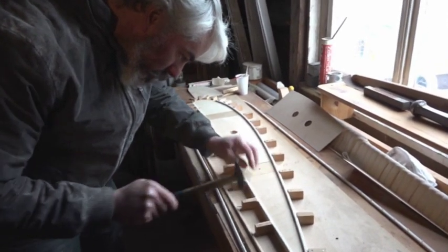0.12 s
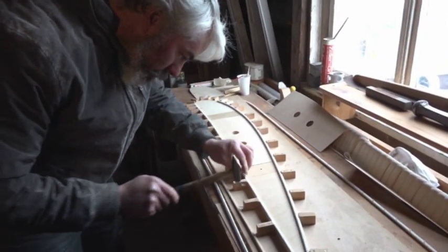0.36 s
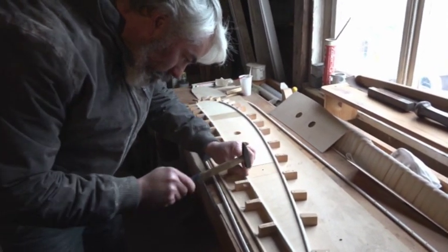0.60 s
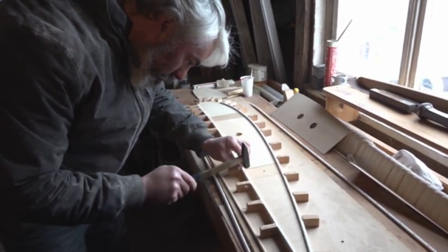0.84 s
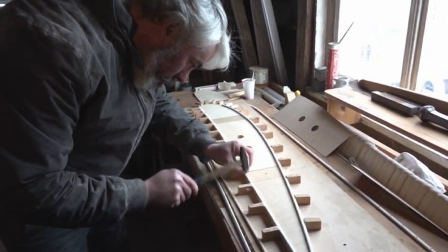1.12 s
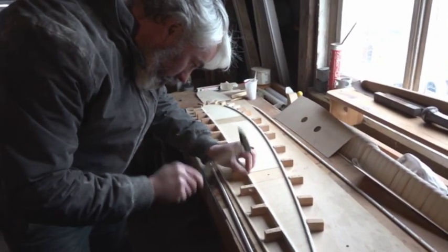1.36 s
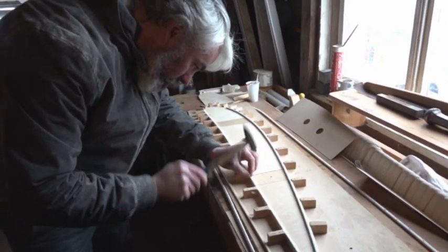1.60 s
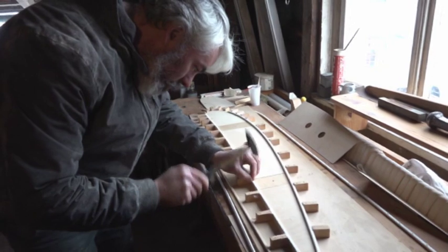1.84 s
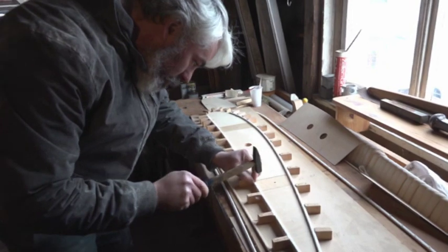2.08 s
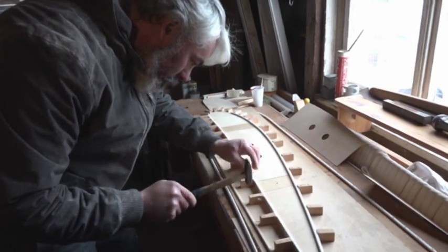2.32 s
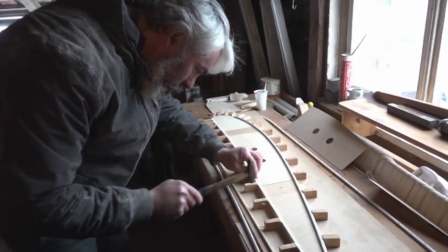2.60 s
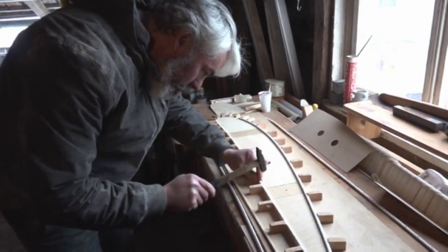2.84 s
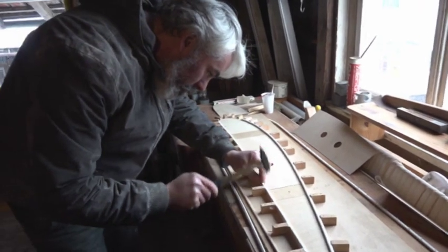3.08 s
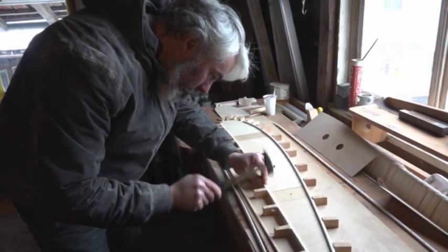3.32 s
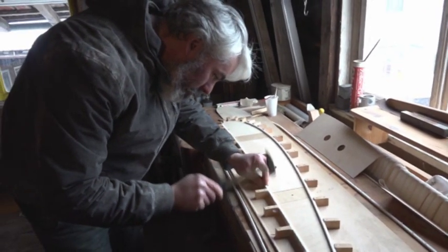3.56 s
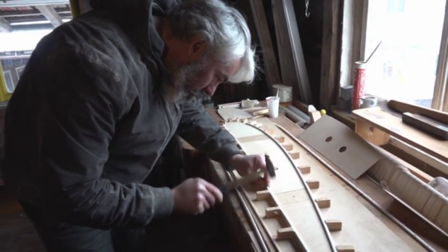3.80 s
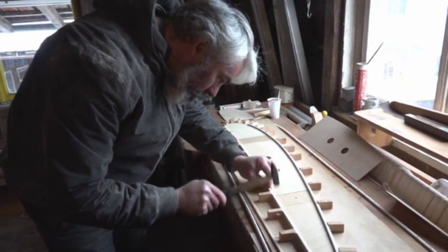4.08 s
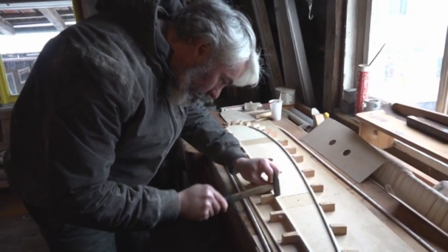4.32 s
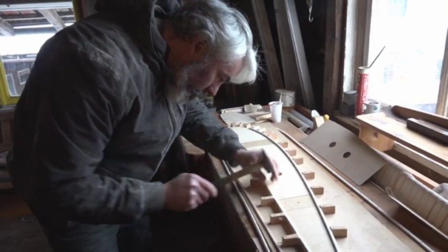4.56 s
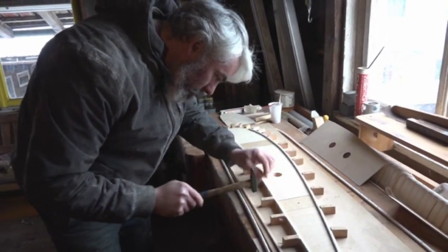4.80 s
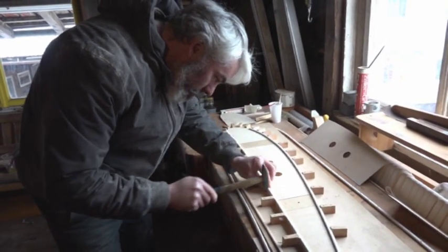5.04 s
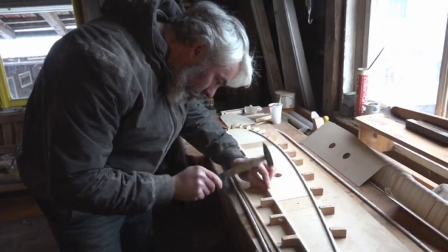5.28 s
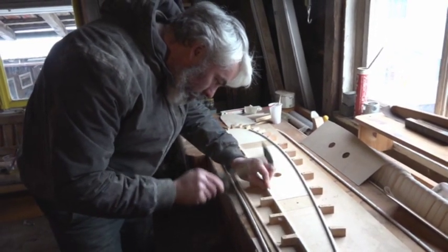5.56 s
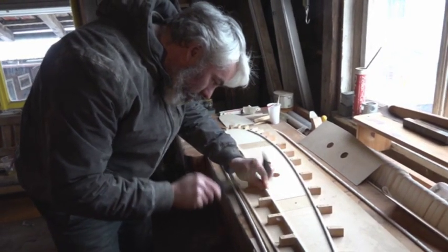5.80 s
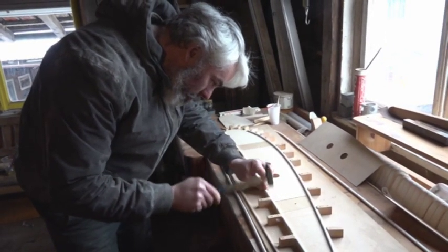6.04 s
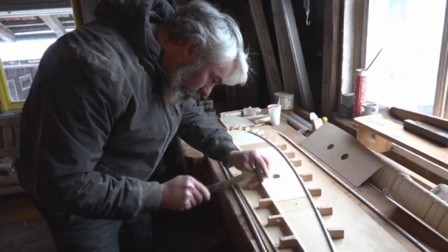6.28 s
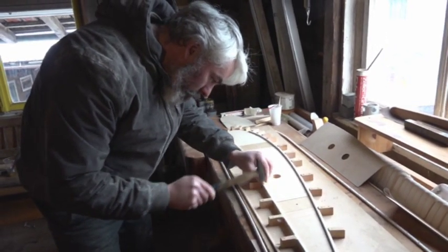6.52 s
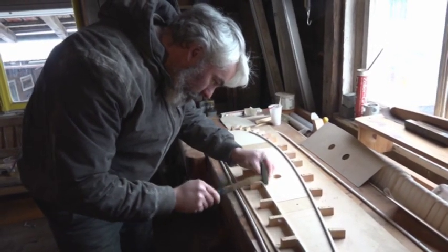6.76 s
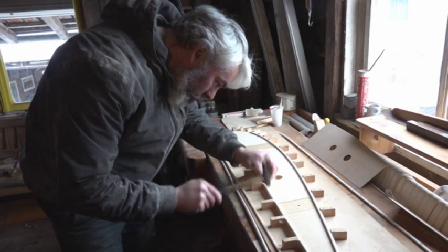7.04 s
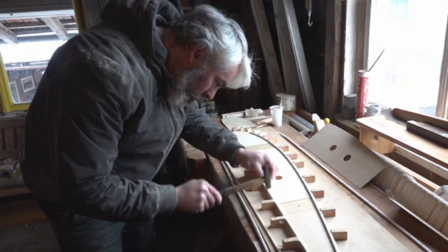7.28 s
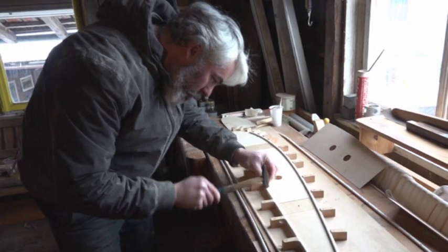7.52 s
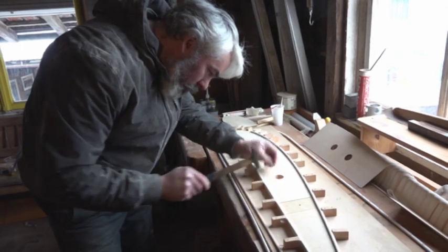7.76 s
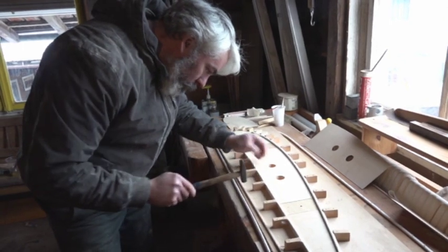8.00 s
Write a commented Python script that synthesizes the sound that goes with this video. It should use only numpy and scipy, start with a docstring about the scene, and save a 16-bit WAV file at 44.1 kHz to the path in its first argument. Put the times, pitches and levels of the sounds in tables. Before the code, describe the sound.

In a small timber workshop a light hammer drives short nails into wood on a bench jig. Each run starts with a dry, light tick and builds to hard, hollow cracks about a quarter second apart, with a short room tail. Between runs come faint sleeve brushes, a thin rasping drag and the tinkle of loose nails. Quiet room tone and hiss; near-mono microphone fairly close, loud blows flattened.

```python
"""In a timber workshop a small hammer taps short nails into wooden strips on a plywood jig.
Each blow is a minimum-phase click that rings damped modes of the jig and excites echoes and a diffuse tail.
Shaped noise makes the brushing sleeve, the rasping drags and the jiggling nails; a faint hum swells from sines.
Room tone and hiss drift behind them. The sound is almost mono, and limiting flattens the hardest blows."""
import sys
import numpy as np
from scipy import signal
from scipy.fft import rfft, irfft, next_fast_len
from scipy.io import wavfile
from scipy.ndimage import uniform_filter1d

SR = 44100
rng = np.random.default_rng(int(sys.argv[2]) if len(sys.argv) > 2 else 0)


def log_audio(samples):
    """Write samples as a 16-bit WAV file to the path given in sys.argv[1]."""
    # one column per channel
    frames = np.atleast_2d(samples).T
    # limit to full scale, then quantise
    limited = np.clip(frames, -1, 1)
    pcm = np.round(limited * 32767).astype(np.int16)
    wavfile.write(sys.argv[1], SR, pcm)


def invert_db(x):
    """Field ratio 10**(x/20) for x, a level in decibels (scalar or array-like)."""
    u = np.asarray(x, float) / 20
    return 10 ** u


N = 358974

# spectral weighting that makes the side signal much weaker than the mid: f/Hz, relative level/dB
SIDE_SPECTRUM = [(700, -67), (1200, -56), (2000, -30.5), (8000, -31.5), (14000, -18.5)]


def evened(x):
    """Normalization to unit root-mean-square value."""
    return x / np.sqrt(np.mean(x ** 2) + 1e-20)


def read(points, hz):
    """Linear interpolation of a tabulated value over logarithmic frequency."""
    f, value = np.transpose(points)
    return np.interp(np.log(hz + 1), np.log(f + 1), value)


def coloured(x, points):
    """Linear filtering: the spectrum of x is weighted by a gain curve in dB."""
    size = next_fast_len(len(x))
    gain = invert_db(read(points, np.fft.rfftfreq(size, 1 / SR)))
    return irfft(rfft(x, size) * gain, size)[:len(x)]


def hammer():
    """Superposition of direct sound, early reflections and a diffuse field, as mid and side signals."""
    # bench, nearest walls and ceiling: delay t/s, level re direct sound/dB
    echoes = [(.004, -10.5), (.0095, -8.5), (0.014, -17.5), (0.0186, -13.5)]
    near = np.zeros(SR)
    near[0] = 1
    for delay, db in echoes:
        start = round(delay * SR)
        near[start:start + 800] += invert_db(db) * chatter()  # rough walls scatter

    feeds = np.zeros((3, N + 2 * SR))  # one second of lead-in holds a blow that falls before the start
    for s, tone, *levels_db, dry_db in strikes():
        at = SR + round(s * SR)
        click, ring = blow(levels_db, tone)
        rattled = signal.fftconvolve(click, chatter())[:len(click)] + invert_db(19) * ring
        crack = signal.lfilter(*signal.butter(2, 360, "highpass", fs=SR), rattled)  # little bass at first
        spread = click + invert_db(17) * ring
        turn = 2 * rng.standard_normal()  # each blow mixes the two tails differently
        direct_feed = invert_db(dry_db) * (crack + bench(click))
        feeds[:, at:at + len(click)] += [direct_feed, np.cos(turn) * spread, np.sin(turn) * spread]

    direct = signal.oaconvolve(feeds[0], near)
    mid = direct + sum(signal.oaconvolve(feed, tail()) for feed in feeds[1:])
    side = direct + sum(signal.oaconvolve(feed, tail()) for feed in feeds[1:])
    return mid[SR:SR + N], coloured(side[SR:SR + N], SIDE_SPECTRUM)


def strikes():
    """Excitation strength sets spectral balance: (s, tone, thud, knock, snap, tick, direct gain), in dB."""
    # hammer blows: t/s, knock level/dB, snap re knock/dB, tick re snap/dB
    hammer_blows = [(-0.1, -20.5, -3, -9.5), (1.48, -41, -4, -9.5), (1.7343, -29, -0.5, -18),
                    (1.964, -26, -3.5, -6.5), (3.025, -41, -7.5, -16), (3.293, -35.5, 4.5, -14.5),
                    (3.5347, -33.5, 2.5, -12), (4.0258, -28, -0.7, -10.5), (4.3343, -20, -2.5, -12),
                    (5.5315, -38, -3.5, -18), (5.8009, -33.5, 7.5, -10.5), (6.0382, -19.5, -3, -9.5),
                    (6.8144, -41.5, 0.3, -19), (7.0852, -31, 6.5, -19.5), (7.3251, -22, -0.5, -14),
                    (7.5636, -20.5, 3, -12.5)]
    # light knocks of hand and tool on the jig: t/s, thud level/dB, knock level/dB, snap level/dB
    light_knocks = [(0.804, -72, -66, -79), (2.46, -83, -79, -73), (2.548, -60, -53.5, -75),
                    (2.5697, -42.5, -44.5, -64), (7.9959, -54, -48, -63), (8.062, -83, -74, -62.5)]
    # tone colour of the light knocks: f/Hz, relative level/dB
    knock_tone = [(117, -1), (230, -1.5), (380, 4), (680, -3), (1200, 0), (2600, 1.5)]
    # a nail still standing gives a dry tick; one driven home shakes the bench and fills the room
    home_db, home_thud_db, home_dry_db = -20, -34.5, 27
    thud_per_knock, dry_per_knock, driest_db = 0.45, 0.72, 37  # dB per dB of knock; upper limit in dB
    rows = []
    for s, knock_db, snap_re_knock, tick_re_snap in hammer_blows:
        thud_db = home_thud_db + thud_per_knock * (knock_db - home_db)
        snap_db = knock_db + snap_re_knock
        dry_db = min(home_dry_db + dry_per_knock * (home_db - knock_db), driest_db)
        rows.append((s, blow_tone(s), thud_db, knock_db, snap_db, snap_db + tick_re_snap, dry_db))
    for s, thud_db, knock_db, snap_db in light_knocks:
        rows.append((s, knock_tone, thud_db, knock_db, snap_db, snap_db - 7, 26.5))
    return rows


def blow_tone(s):
    """Spectral weighting of a blow at time s, as the last listed row begun by then gives it."""
    # tone colour of the blows by stretch of time:
    # from t/s, boom level/dB, hollow level/dB, knock level/dB, clack level/dB (all relative)
    stretches = [(-1, -1, 0.5, 0.3, -2.9), (2.5, -2.5, 4.5, -3.5, 4), (3, -3, -1.5, -1.5, 0.7),
                 (3.5, -0.2, -0.6, 2.2, -0.54), (8, 0.6, -1.2, 1.2, -0.3), (7, 2.5, -3, -0.5, -0.8)]
    # centres of boom, hollow, knock and clack: f/Hz
    tone_hz = [117, 230, 680, 1200]
    tones_db = [row[1:] for row in stretches if row[0] < s][-1]
    return [*zip(tone_hz, tones_db), (2 * tone_hz[-1], 0)]  # fades out towards the treble


def blow(levels_db, tone):
    """Minimum-phase impact, and the damped modal vibration it excites in the jig."""
    # colour of a blow as the microphone hears it: f/Hz, relative level/dB
    contact = [(30, -21), (60, -0.5), (120, 16.5), (230, 15), (400, 16.5), (700, 8), (1100, 11.5),
               (2000, 6.5), (3200, 9), (5000, 9.5), (8500, 4), (10500, -7.5), (14000, -3), (17000, -16)]
    # centres of thud, knock, snap and tick: f/Hz
    part_hz = [200, 700, 3300, 9000]
    # modes of the jig board: f/Hz, relative level/dB, 60 dB decay time t/s
    jig = [(117, -7.5, 0.36), (227.2, 7.5, .1), (317, -6, 0.066), (558, -0.5, 0.16), (629, 8, 0.051),
           (733, 12.5, 0.03), (925, 2.5, 0.076), (1510, -14, 0.079), (1730, 0.5, 0.012),
           (3080, -5.5, 0.008), (5650, -2.5, 0.046)]
    hz = np.fft.rfftfreq(8192, 1 / SR)
    spectrum_db = read(contact, hz) + read(list(zip(part_hz, levels_db)), hz) + read(tone, hz)
    log_gain = np.log(invert_db(spectrum_db))
    circle = np.r_[log_gain, log_gain[-2:0:-1]]
    # the Hilbert transform of the log gain gives the minimum phase
    click = np.fft.ifft(np.exp(np.conj(signal.hilbert(circle)))).real[:4096]

    t = np.arange(4096) / SR
    f, db, t60 = np.transpose(jig)[:, :, None]
    # random spread of the mode levels, so no two strikes ring quite alike
    spread_db = 2.4 * rng.standard_normal((len(jig), 1))
    decay = invert_db(db + spread_db - 60 * t / t60) / t60
    modes = (decay * np.cos(2 * np.pi * f * t)).sum(0) / SR
    return click, signal.fftconvolve(click, modes)[:len(t)]


def chatter():
    """Incoherent repeated contact: a few ms of decaying noise of unit energy, as head, nail and strip rattle."""
    t = np.arange(800) / SR
    burst = rng.standard_normal(800) * np.minimum(t / .0008, 1) * invert_db(-60 * t / .013)
    return burst / np.linalg.norm(burst)


def bench(click):
    """Delayed resonant response: a few low cycles of the bench swell and die shortly after the blow."""
    bench_hz, delay_s, width_s = 227.7, .018, 0.0058
    t = np.arange(len(click)) / SR
    swell = np.exp(-((t - delay_s) / width_s) ** 2 / 2)
    thump = swell * np.sin(2 * np.pi * bench_hz * t)
    return invert_db(-41) * signal.fftconvolve(click, thump)[:len(click)]


def tail():
    """Diffuse reverberation: dense reflections build up over a few ms and each band decays at its own rate."""
    # reverberation of the shop: f/Hz, 60 dB decay time of the main slope t/s
    shop = [(60, 0.58), (160, 0.47), (420, 0.44), (1100, 0.38), (2900, 0.34), (7700, 0.25), (11000, 0.27),
            (15000, 0.078)]
    hz, t, z = signal.stft(rng.standard_normal(SR), SR, nperseg=256)
    main_db = -60 * t / read(shop, hz)[:, None]
    far_end = invert_db(-21.5 + 0.51 * main_db)  # lingers faintly
    nearby_bench = invert_db(9.0 + 10.0 * main_db)  # dies ten times as fast
    shape = invert_db(main_db) + far_end + nearby_bench
    dying = signal.istft(z * shape, SR, nperseg=256)[1][:SR]
    return dying * np.clip((np.arange(SR) / SR - .003) / 0.0042, 0, 1)


def sleeve():
    """Frictional noise of a sleeve brushing."""
    # strokes: start t/s, rise t/s, hold t/s, level/dB
    brushes = [(0.46, 0.039, 0.06, -75.5), (0.63, 0.051, 0.01, -74), (0.77, 0.014, 0.096, -68),
               (2.452, 0.01, 0.049, -73), (2.647, 0.012, 0.029, -62.5), (2.737, 0.025, 0.068, -69.5)]
    # noise spectrum: f/Hz, relative level per Hz/dB
    cloth = [(400, -32), (800, -28), (1700, -2), (2300, -8), (2750, -7), (3100, -2), (3550, 0.5),
             (4100, -4), (5500, -8.5), (6300, -26), (8500, -14.5), (10500, -29), (14000, -43)]
    return rubbing(brushes, cloth, grain_db=0.5)


def drags():
    """Frictional noise of something dragged over the board, with a thin rasp."""
    # strokes: start t/s, rise t/s, hold t/s, level/dB
    pulls = [(6.464, 0.014, 0.087, -64.5), (6.63, 0.063, 0.05, -56.5), (6.76, 0.017, 0.018, -71)]
    # noise spectrum: f/Hz, relative level per Hz/dB
    rasp = [(400, -31), (800, -11.5), (1700, -10), (2350, -8), (2750, 0), (3100, -5), (4000, -9),
            (4800, -16), (5500, -4), (6200, -21), (8500, -19), (10500, -32), (14000, -43)]
    return rubbing(pulls, rasp, grain_db=2.5)


def rubbing(strokes, colour, grain_db):
    """Friction as amplitude-modulated noise: random grain under the envelope of each stroke."""
    grain = invert_db(grain_db * evened(uniform_filter1d(rng.standard_normal(N), 120)))
    noise = evened(coloured(rng.standard_normal(N), colour) * grain)
    return noise * sum(stroke(*row) for row in strokes)


def stroke(start, rise, hold, db):
    """Envelope linear in dB: a rise of 20.5 dB, a hold, then a fall of 347 dB/s."""
    t = np.arange(N) / SR - start
    below_db = 20.5 * np.clip(1 - t / rise, 0, 1)
    fallen_db = 347 * np.maximum(t - rise - hold, 0)
    return (t > 0) * invert_db(db - below_db - fallen_db)


def jiggles():
    """Exponentially decaying noise bursts: loose nails jiggle on the jig, thin and high."""
    # ticks: t/s, level/dB
    ticks = [(1.8033, -61), (1.849, -56), (1.8844, -57), (2.0644, -55), (2.0744, -64.5), (2.2036, -63),
             (2.7038, -65), (2.779, -67), (4.563, -61), (4.5774, -58.5)]
    t, envelope = np.arange(N) / SR, np.zeros(N)
    for s, db in ticks:
        envelope += (t > s) * invert_db(db - 60 * np.maximum(t - s, 0) / 0.083)  # 60 dB decay in 0.083 s
    # steel: (f/Hz, relative level/dB)
    steel_spectrum = [(2000, -38), (5000, -0.5), (9000, -5.5), (11000, -24.0), (13500, -4.5), (16000, -10.0)]
    steel = coloured(rng.standard_normal(N), steel_spectrum)
    return evened(steel) * envelope


def hum():
    """Amplitude modulation of pure tones: low sines swell, fade and flutter a little."""
    # swells: start t/s, length t/s, f/Hz, rms level at the crest before flutter/dB
    swells = [(-0.2, 0.93, 69, -79.5), (0.62, 1.3, 69.5, -73.5), (2.5, 1.0, 64, -81),
              (3.9, 1.32, 60.5, -76.5)]
    t = np.arange(N) / SR
    slow = uniform_filter1d(uniform_filter1d(rng.standard_normal(N), 3000), 3000)
    flutter_db = 2.0 * evened(slow)
    tones = np.zeros(N)
    for s, length, hz, db in swells:
        half_sine = abs(np.sin(np.pi * np.clip((t - s) / length, 0, 1)))
        tones += invert_db(db) * half_sine ** 0.82 * np.sin(2 * np.pi * hz * t)
    return np.sqrt(2) * invert_db(flutter_db) * tones


def air():
    """Noise with slow spectral fluctuation: room tone and preamplifier hiss in drifting patches."""
    # noise spectrum: f/Hz, relative level per Hz/dB
    air_spectrum = [(25, -25.5), (50, -4), (80, -12), (120, 1.5), (160, -2), (250, -0.5), (400, -7),
                    (1000, -6), (2500, -14), (4000, -8.5), (6300, -18), (10000, -19.5), (13300, -28.5),
                    (14000, -45)]
    # overall level: t/s, level/dB
    air_level = [(0, -70), (1.4, -70.5), (2.4, -69.5), (3, -74), (4, -72), (5.4, -72), (6.6, -72),
                 (8.14, -71)]
    z = signal.stft(coloured(rng.standard_normal(N), air_spectrum), nperseg=2048)[2]
    # smoothed over 30 frequency bins and 8 time frames
    patches = evened(uniform_filter1d(uniform_filter1d(rng.standard_normal(z.shape), 30, 0), 8, 1))
    tone = signal.istft(z * invert_db(1.2 * patches), nperseg=2048)[1][:N]
    s, db = np.transpose(air_level)
    return evened(tone) * invert_db(np.interp(np.arange(N) / SR, s, db))


def scene():
    """Linear superposition of all sources, turned from mid and side to left and right."""
    mid, side = hammer()
    mid = mid + sleeve() + drags() + jiggles() + air() + hum()
    side = side + invert_db(10.0) * coloured(air(), SIDE_SPECTRUM)  # independent noise
    return np.array([mid + side, mid - side])


def limited(x, ceiling_db, release_db, share):
    """Gain reduction by a share of the excess of a held peak, which sinks by release_db a second."""
    peak_db = 20 * np.log10(abs(x).max(0) + 1e-9)
    fall = np.arange(N) * release_db / SR
    held_db = np.maximum.accumulate(peak_db + fall) - fall
    over_db = np.maximum(held_db - ceiling_db, 0)
    return x / invert_db(share * uniform_filter1d(over_db, 30))


def band_limit(x):
    """A steep low-pass at the top of the band."""
    return signal.sosfilt(signal.butter(12, 16280, fs=SR, output="sos"), x)


def record(dry):
    """Band limiting, then a quick limiter for the first crack and a slower one that acts on into the tail."""
    no_bass = signal.sosfilt(signal.butter(2, 55, "highpass", fs=SR, output="sos"), dry)
    edged = signal.sosfilt(signal.cheby2(10, 40, 16000, fs=SR, output="sos"), no_bass)
    shaved = limited(edged, ceiling_db=-9.0, release_db=1495.5, share=.85)
    held = limited(shaved, ceiling_db=-12.0, release_db=148.5, share=0.81)
    return band_limit(held)


dry = scene()
out = record(dry)
log_audio(out)
```